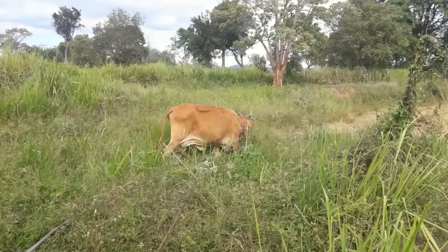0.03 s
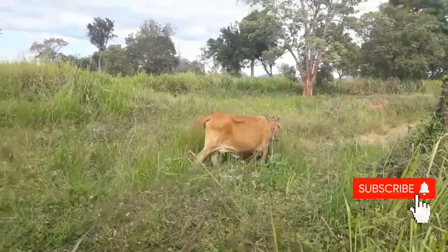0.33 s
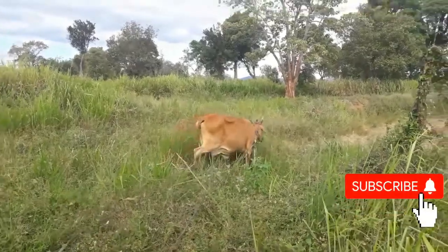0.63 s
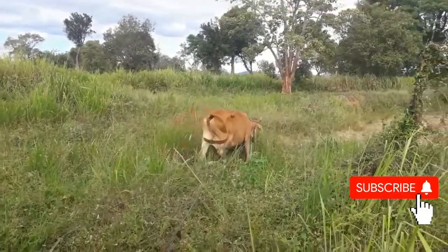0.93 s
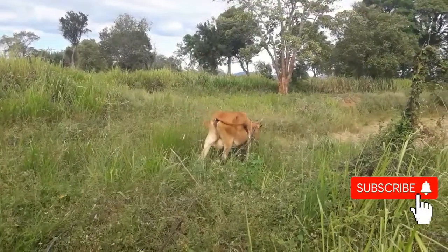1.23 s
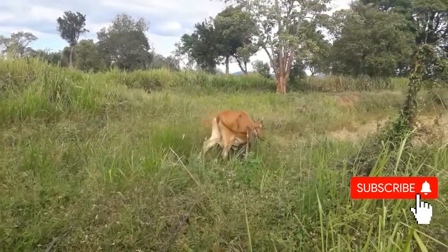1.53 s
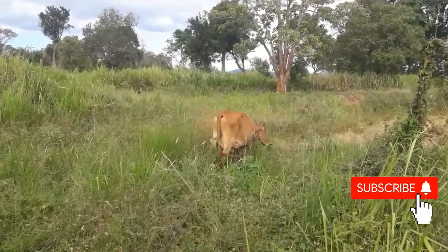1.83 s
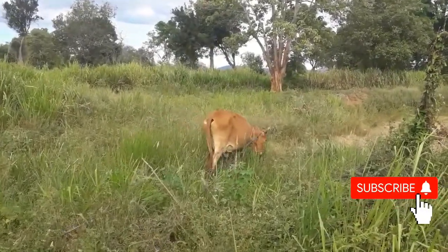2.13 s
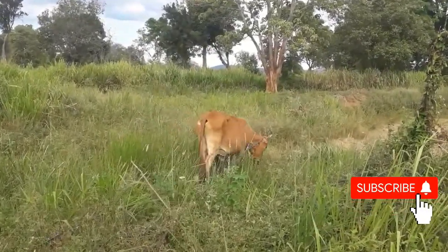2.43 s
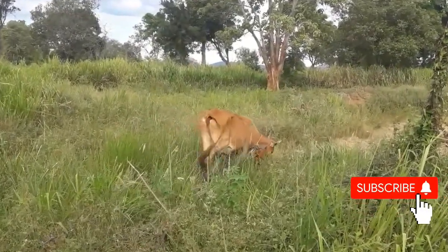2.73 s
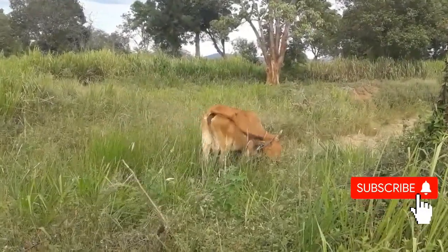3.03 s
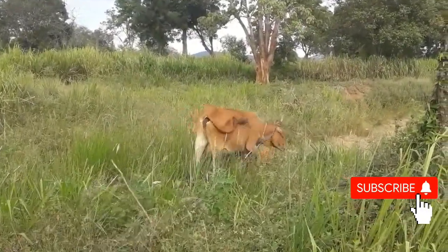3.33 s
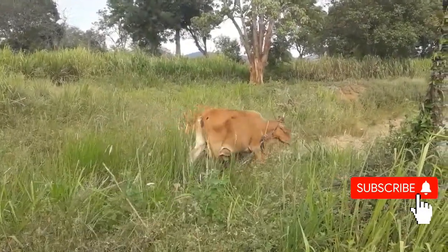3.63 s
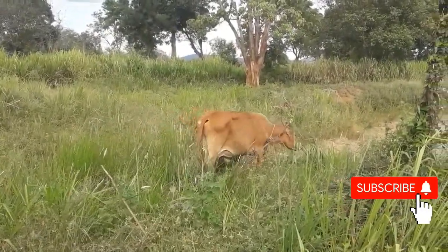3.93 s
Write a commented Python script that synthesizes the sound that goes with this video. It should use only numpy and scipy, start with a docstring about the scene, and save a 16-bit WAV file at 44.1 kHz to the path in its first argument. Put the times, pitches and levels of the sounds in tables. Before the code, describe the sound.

Rustling, crackling grass in a field, with a small bird chirping four times.

```python
"""A grassy field. Tall grass rustles in swells as the blades brush together, with brief swishes; stalks tick
and dry blades crackle. Behind it sit a steady insect hiss, soft wind and a faint, wavering low drone. A small
bird sings one quick warbled call four times, a run of gliding, nearly pure notes that bounce off the ground and
foliage. A far bird answers with low whistles. The mix is mono and fades in after a moment of silence."""
import sys
import numpy as np
from scipy import signal
from scipy.fft import rfft, irfft, next_fast_len
from scipy.io import wavfile
from scipy.ndimage import map_coordinates

SR = 44100
rng = np.random.default_rng(int(sys.argv[2]) if len(sys.argv) > 2 else 0)


def materialize(psi):
    """Save the field psi as 16-bit PCM at rate SR to the path in sys.argv[1].

    A 1-D psi becomes a single channel; in a 2-D psi each row is a channel.
    """
    bounded = np.clip(np.atleast_2d(psi).T, -1, 1)
    quanta = np.round(bounded * 32767).astype(np.int16)
    wavfile.write(sys.argv[1], SR, quanta)


N = 176400

# swells of the grass: time_s, body_db, fizz_db
GRASS_SWELLS = [(0.25, -51.5, -51), (0.35, -50.5, -51.5), (0.46, -49, -49.5), (0.52, -52, -53),
                (0.62, -49, -50.5), (0.8, -46, -47.5), (0.92, -47, -48.0), (1.03, -43.0, -45.5),
                (1.12, -46.5, -48), (1.25, -49.0, -49.5), (1.38, -44.5, -45.5), (1.48, -49, -51),
                (1.62, -48, -48), (1.8, -50.5, -51.5), (1.9, -50.5, -50.5), (2.04, -49.5, -48),
                (2.17, -46.5, -47), (2.23, -50, -50.5), (2.36, -47, -48.5), (2.48, -45.5, -47.5),
                (2.62, -51.5, -55.5), (2.73, -54.5, -57.5), (2.8, -51.5, -52), (2.86, -51, -52.5),
                (2.99, -44.0, -44), (3.12, -47.5, -46.5), (3.25, -47.0, -47.5), (3.43, -47.0, -45.5),
                (3.54, -50, -52.5), (3.65, -56.5, -56), (3.7, -51, -50.5), (3.75, -57, -55.5),
                (3.8, -52.0, -49.5), (3.9, -51.5, -47.0), (3.97, -59, -55.0), (4.0, -56.5, -52)]
# EQ of the rustle's body: frequency_hz, gain_db
BODY_EQ = [(76, -26), (130, -16), (222, -15.5), (322, -11), (522, -13.5), (566, -15), (644, -14),
           (745, -12), (1210, -11), (1650, -4.5), (3580, 0), (4210, -6), (4940, -8.5), (5720, -16),
           (6200, -16.5), (8060, -36), (13600, -120)]
# EQ of the fizz on top: frequency_hz, gain_db
FIZZ_EQ = [(3500, -23.5), (5500, -11), (7000, 0), (8200, -6.5), (9500, -2.5), (11000, 1), (13000, -5),
           (14300, -1), (15400, 1.5)]
# EQ of a blade or stalk snapping: frequency_hz, gain_db
SNAP_EQ = [(300, -22), (1500, -17), (3200, 11), (5500, 6), (11000, -8), (15000, -13)]
# EQ of the insect hiss: frequency_hz, gain_db
INSECT_EQ = [(5600, -30), (6350, -6.5), (6800, 5.5), (7250, 3), (7700, -14), (8600, -49)]
# EQ of the open-air bed: frequency_hz, gain_db
AIR_EQ = [(20, -25), (45, 0.5), (110, 0.5), (300, -5.5), (900, -4.5), (3000, -5), (6000, -13), (15000, -9)]
# soft wind buffets on the microphone: peak_s, width_s, level_db
WIND_BUFFETS = [(1.6, .08, -61), (3.2, .22, -61), (3.89, 0.053, -57.5)]
# EQ of the buffets: frequency_hz, gain_db
BUFFET_EQ = [(20, -20), (45, 0), (80, 4), (140, -14.5), (400, -18), (1000, -68)]
# brief swishes of the grass rustle: peak_s, width_s, level_db
GRASS_SWISHES = [(.34, .012, -49), (.455, .008, -53), (1.558, .009, -42.5), (1.918, 0.0075, -44.5),
                 (3.18, 0.021, -46), (3.82, .02, -51.5)]
# stalks ticking: start_s, level_db, ring_hz, t60_s, snap_over_ring_db
STALK_TICKS = [(0.411, -43, 3000, .006, -9), (0.455, -28.5, 2680, 0.0068, -12),
               (1.1635, -29.5, 3470, 0.017, -14), (1.319, -42, 4020, .004, 6),
               (1.4355, -33, 4200, .005, -10), (1.484, -38, 2980, .006, -2), (1.496, -41, 316, 0.011, -18),
               (1.788, -34.5, 2520, 0.011, -17), (1.851, -43, 1800, .015, -11), (1.8718, -40, 2740, .02, 0),
               (1.894, -32.5, 3760, 0.0091, 2), (2.1846, -29, 3500, 0.0061, 3),
               (2.2424, -37, 5170, 0.012, -5), (2.6989, -39, 2880, 0.017, -9),
               (2.7598, -44, 3590, .008, -5), (2.8113, -35, 3680, 0.0065, -8),
               (3.7878, -36.5, 1980, 0.0099, -1), (3.7886, -30, 3630, 0.0055, -3)]
# dry blades crackling: start_s, level_db, centre_hz, t60_s
BLADE_CRACKLES = [(.45, -45, 12500, .04), (.606, -35, 14800, .008), (.8155, -33, 14600, .008),
                  (.844, -36, 15000, .008), (1.0157, -33, 15000, .01), (1.4825, -49, 10700, 0.0069),
                  (1.8492, -42, 14200, .03), (1.8716, -38.5, 14600, 0.041), (1.947, -40, 11200, .05),
                  (2.185, -33, 8600, 0.01), (2.339, -35, 11700, 0.011), (2.7593, -43, 9670, .015),
                  (2.7787, -42, 11300, 0.03), (2.8105, -38, 11000, .016), (3.1068, -33, 14500, .012),
                  (3.306, -43, 9160, .02), (3.8892, -41, 11000, .04), (3.8969, -39, 11200, 0.044)]
# path of the low drone: time_s, pitch_hz, level_db
DRONE_PATH = [(.48, 78.3, -76), (.56, 72.4, -50.5), (.63, 76, -76), (.69, 78.6, -57), (1.24, 76.3, -64.5),
              (1.33, 67.5, -55), (1.43, 70.2, -85), (1.78, 79.6, -80), (1.9, 86.7, -70), (2.38, 82.8, -68),
              (2.47, 67.4, -52), (2.58, 88, -72), (2.92, 85, -62.5), (3.05, 77.9, -57), (3.38, 78, -56),
              (3.5, 78, -65), (3.6, 70.2, -56), (3.88, 77, -65), (4, 72, -66)]
# cues for the near bird's calls: start_s, level_db
CALL_CUES = [(.639, -32), (.966, -31), (1.297, -31), (1.645, -32)]
# notes of one call: offset_s, length_s, level_db, crest_fraction, then pitch_hz at four even steps
CALL_NOTES = [(.008, .0185, -7, 0.85, 6830, 6600, 5700, 4060),
              (.036, 0.025, -7.5, 0.66, 3210, 3540, 3620, 3700),
              (0.056, 0.0143, -2.5, 0.86, 4860, 4210, 3860, 3860),
              (.072, 0.013, -2, 0.61, 3670, 3610, 3690, 3650),
              (.078, 0.023, -3.5, 0.56, 4570, 4670, 4600, 4640),
              (.098, .026, -1, .4, 5620, 5270, 5656, 5880),
              (.130, .0135, -3.5, 0.55, 4060, 4280, 4514, 4530),
              (0.144, 0.035, -0.5, .3, 5400, 4550, 3350, 2995)]
# how well each pitch of a bird carries: pitch_hz, gain_db
VOICE_EQ = [(2900, -2), (3700, -6.5), (4100, -5), (4500, 0.5), (5500, -1), (6000, -4), (6800, -4)]
# the far bird's whistles: start_s, length_s, level_db, start_hz, middle_hz, end_hz
FAR_WHISTLES = [(1.186, 0.062, -57.5, 1000, 980, 970), (1.276, 0.08, -53.5, 940, 965, 830),
                (1.37, 0.029, -48, 800, 810, 950), (1.406, 0.035, -50, 1102, 1060, 850),
                (1.508, 0.028, -44.5, 814, 835, 960), (1.543, 0.043, -46.5, 964, 980, 620),
                (1.685, 0.026, -42.5, 790, 816, 830), (1.706, .05, -45.5, 960, 990, 830),
                (2.547, 0.086, -53.5, 956, 930, 950), (3.593, .09, -55, 935, 940, 990)]

FIELD_T60_S = 0.4


def amp(db):
    """Decibels to gain."""
    return 10 ** (np.asarray(db) / 20)


def unit(x):
    """Scale to rms 1."""
    return x / np.sqrt(np.mean(x ** 2) + 1e-20)


def curves(rows):
    """Automation lanes: one value per sample for each column after the time."""
    times, *columns = np.transpose(rows)
    return [np.interp(np.arange(N) / SR, times, column) for column in columns]


def swells(rows):
    """A gain curve of bell-shaped swells from rows of peak_s, width_s, level_db."""
    t = np.arange(N) / SR
    return sum(amp(db) * np.exp(-((t - peak_s) / width_s) ** 2 / 2) for peak_s, width_s, db in rows)


def wobble(rate_hz, size=N):
    """Smooth random modulation with rate_hz knots a second."""
    knots = rng.standard_normal(size // 8 + 4)
    return map_coordinates(knots, [np.arange(size) * rate_hz / SR], mode="wrap")


def filtered(x, response):
    """Filter x with a gain given as a function of frequency."""
    size = next_fast_len(N + SR // 2)
    return irfft(rfft(x, size) * response(np.fft.rfftfreq(size, 1 / SR)), size)[:N]


def noise(eq):
    """Noise of rms 1, coloured by an EQ table."""
    points_hz, db = np.transpose(eq)
    white = rng.standard_normal(N)
    return unit(filtered(white, lambda hz: amp(np.interp(np.log(hz + 1), np.log(points_hz + 1), db))))


def decay(t60_s):
    """A half-second envelope that falls 60 dB in t60_s."""
    return np.exp(-np.log(1000) * np.arange(SR // 2) / SR / t60_s)


def add(track, start_s, sound):
    """Mix a sound into the track at start_s."""
    part = track[max(round(start_s * SR), 0):][:len(sound)]
    part += sound[:len(part)]


def scattered(x, t60_s, predelay_s=0.007):
    """Outdoor reverb: the sound thrown back late by ground and foliage."""
    tail = decay(t60_s) * rng.standard_normal(SR // 2)
    delayed = np.pad(x, (int(predelay_s * SR), 0))
    return signal.fftconvolve(delayed, tail / np.linalg.norm(tail))[:N]


def grass(body_trim_db=3, fizz_trim_db=4.58, crackle_trim_db=-6, crackles_per_s=93):
    """Blades brush together: a grainy body, a fine fizz and tiny crackles that ride the swells."""
    body_db, fizz_db = curves(GRASS_SWELLS)
    shared_grain_db = 1.15 * wobble(130)
    body = amp(body_db + body_trim_db + shared_grain_db + wobble(600)) * noise(BODY_EQ)
    fizz = amp(fizz_db + fizz_trim_db + shared_grain_db + 1.5 * wobble(900)) * noise(FIZZ_EQ)
    contacts = rng.random(N) < crackles_per_s / SR
    accent_db = 3 * np.minimum(rng.exponential(size=N), 3)
    crackle = signal.fftconvolve(contacts * amp(accent_db), decay(t60_s=0.0022))[:N] * noise(SNAP_EQ)
    return body + fizz + amp(fizz_db + crackle_trim_db) * crackle


def insects(level_db=-54.5, shimmer_db=1.25):
    """Many far insects blend into a steady, narrow hiss."""
    return amp(level_db + shimmer_db * wobble(39.96)) * noise(INSECT_EQ)


def air(bed_db=-54.5):
    """An open-air bed, with a few soft buffets of wind on the microphone."""
    return amp(bed_db) * noise(AIR_EQ) + swells(WIND_BUFFETS) * noise(BUFFET_EQ)


def swishes(grain_db=1.5):
    """Brief, grainy swishes of the same rustle: short swells riding over the grass."""
    return swells(GRASS_SWISHES) * amp(grain_db * wobble(600)) * noise(BODY_EQ)


def stalks(attack_s=0.00037, reverb_db=-7.5):
    """Stalks tick: each a noisy snap with one short ring."""
    t = np.arange(SR // 2) / SR
    rings, snaps = np.zeros(N), np.zeros(N)
    for start_s, db, ring_hz, t60_s, snap_db in STALK_TICKS:
        envelope = amp(db) * decay(t60_s) * (1 - np.exp(-t / attack_s))
        add(rings, start_s, 1.73 * envelope * np.sin(2 * np.pi * ring_hz * t))
        add(snaps, start_s, amp(snap_db) * envelope)
    ticks = rings + snaps * noise(SNAP_EQ)
    return ticks + amp(reverb_db) * scattered(ticks, t60_s=0.04)


def dry_blades(grain_db=1.0, width_hz=1450):
    """Dry blades crackle: each a short, grainy burst in one broad, very high band."""
    out = np.zeros(N)
    hz = np.fft.rfftfreq(SR // 2, 1 / SR)
    for start_s, db, centre_hz, t60_s in BLADE_CRACKLES:
        band = np.exp(-((hz - centre_hz) / (2 * width_hz)) ** 2)
        burst = unit(irfft(rfft(rng.standard_normal(SR // 2)) * band))
        envelope = amp(db + grain_db * wobble(900, size=SR // 2)) * decay(t60_s)
        add(out, start_s, envelope * burst)
    return out


def drone(waver_db=2.3):
    """A faint low tone that wavers in pitch and level."""
    hz, db = curves(DRONE_PATH)
    return amp(db + waver_db * wobble(16)) * np.sin(2 * np.pi * np.cumsum(hz) / SR)


def whistle(length_s, pitches_hz, crest, detune=0.0044, flutter=0.0061, flutter_db=1.6):
    """One nearly pure bird note that glides through its pitches and swells to one crest."""
    progress = np.linspace(0, 1, int(length_s * SR))
    glide = np.polyfit(np.linspace(0, 1, len(pitches_hz)), pitches_hz, len(pitches_hz) - 1)
    bend = 1 + detune * rng.normal() + flutter * wobble(360, size=SR // 4)[:len(progress)]
    hz = np.polyval(glide, progress) * bend
    phase = 2 * np.pi * np.cumsum(hz) / SR
    arch = np.interp(progress, [0, np.clip(crest, .05, .95), 1], [0, np.pi / 2, np.pi])
    envelope = np.abs(np.sin(arch)) ** 0.84
    voice_db = np.interp(hz, *np.transpose(VOICE_EQ))
    tremble_db = flutter_db * wobble(290, size=SR // 4)[:len(progress)]
    return envelope * amp(voice_db + tremble_db) * np.sin(phase)


def near_bird(trim_db=3, bounce_s=0.0095, bounce_db=-12, echo_db=-11.5, tail_db=-13.5):
    """A small bird repeats one run of notes, with a ground bounce, a short echo and a faint tail."""
    calls, bounce = np.zeros(N), np.zeros(N)
    for start_s, call_db in CALL_CUES:
        for offset_s, length_s, note_db, crest, *pitches_hz in CALL_NOTES:
            note = whistle(length_s, pitches_hz, crest)
            add(calls, start_s + offset_s, amp(trim_db + call_db + note_db) * note)
    add(bounce, bounce_s, amp(bounce_db) * calls)
    echo = amp(echo_db) * scattered(calls, t60_s=0.044)
    tail = amp(tail_db) * scattered(calls, FIELD_T60_S)
    return calls + bounce + echo + tail


def far_bird(tail_db=-9.5):
    """A far bird answers from the trees with soft, low whistles and a wetter tail."""
    notes = np.zeros(N)
    for start_s, length_s, db, *pitches_hz in FAR_WHISTLES:
        add(notes, start_s, amp(db) * whistle(length_s, pitches_hz, crest=0.61))
    return notes + amp(tail_db) * scattered(notes, FIELD_T60_S)


def scene():
    """Beds, plant detail, drone and birds in one mono mix, alike in both channels."""
    beds = grass() + insects() + air()
    plants = swishes() + stalks() + dry_blades()
    mono = beds + plants + drone() + near_bird() + far_bird()
    return np.array([mono, mono])


def record(dry):
    """The master: a moment of silence, a quick fade-in and a brick-wall high cut."""
    silence_s, fade_s, high_cut_hz = 0.19, 0.07, 15500
    fade = np.clip((np.arange(N) / SR - silence_s) / fade_s, 0, 1)
    return np.array([filtered(side * fade, lambda hz: hz < high_cut_hz) for side in dry])


dry = scene()
out = record(dry)
materialize(out)
```